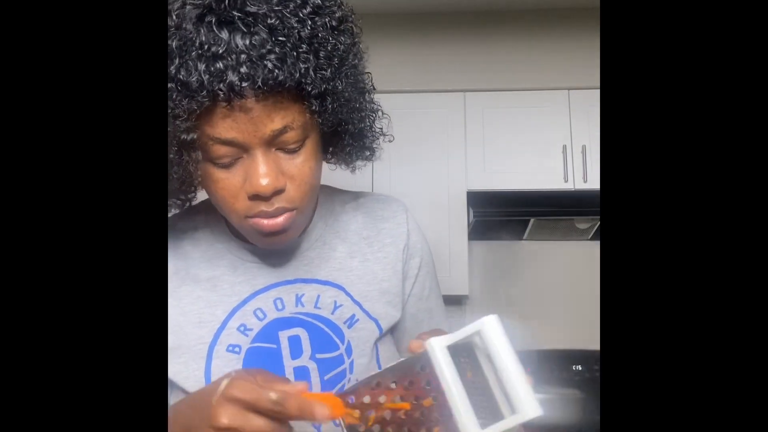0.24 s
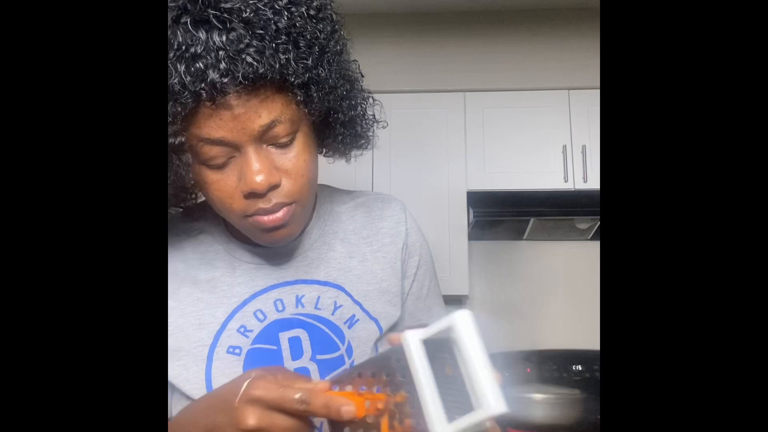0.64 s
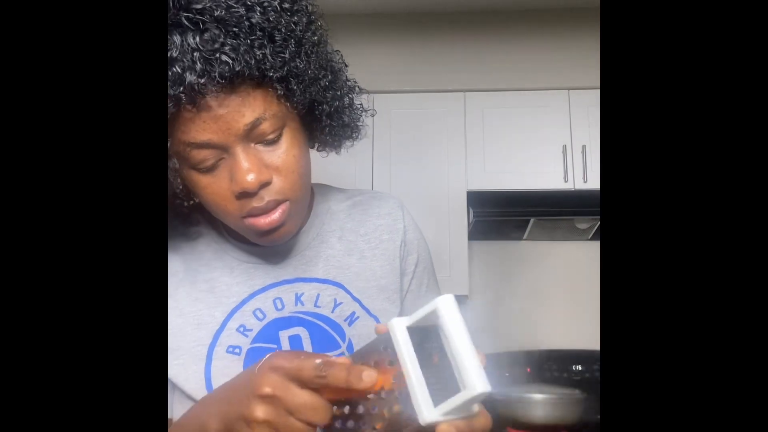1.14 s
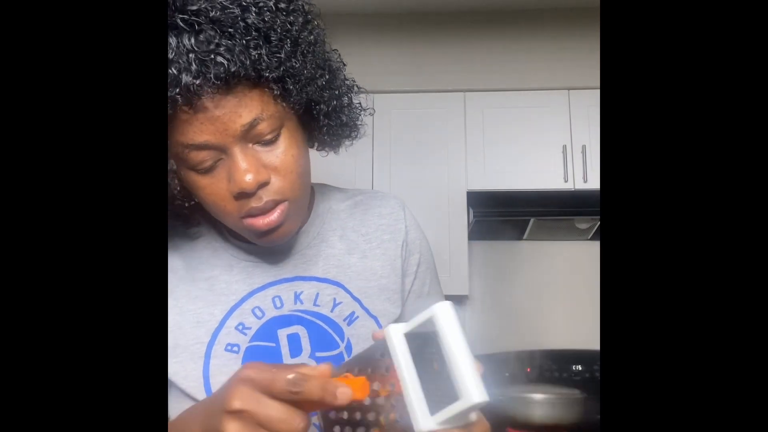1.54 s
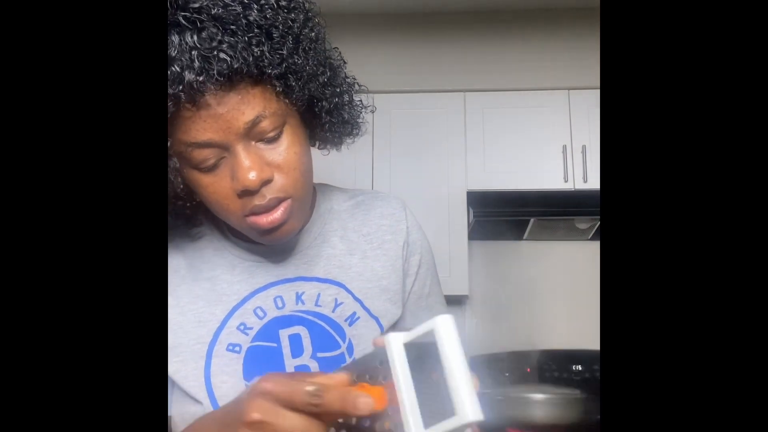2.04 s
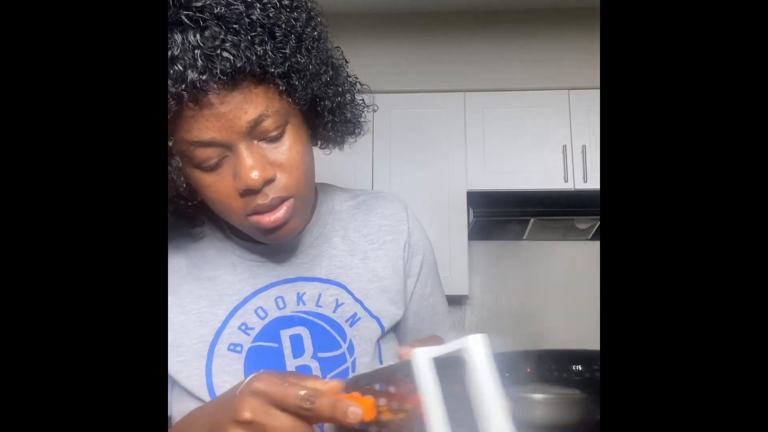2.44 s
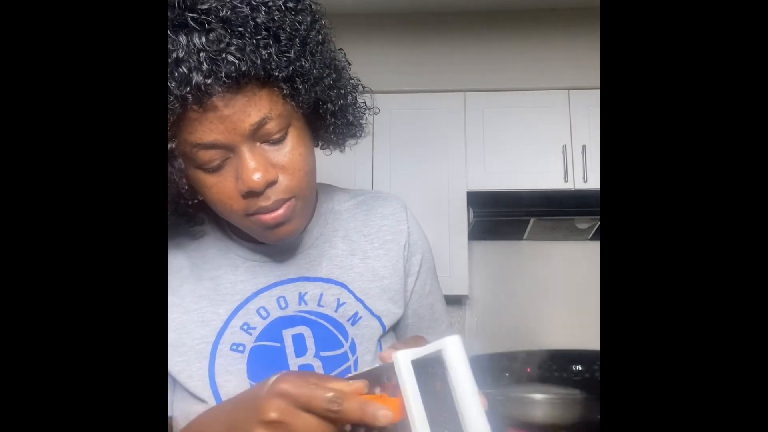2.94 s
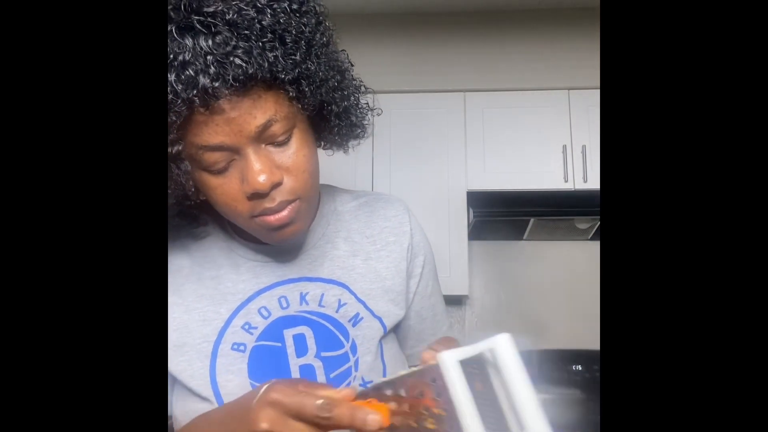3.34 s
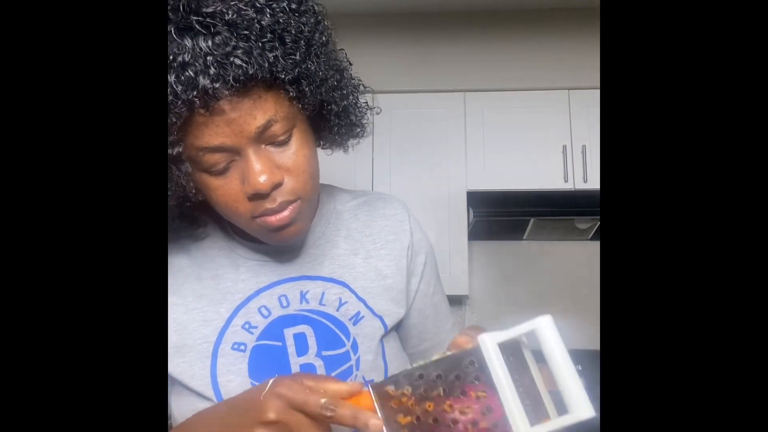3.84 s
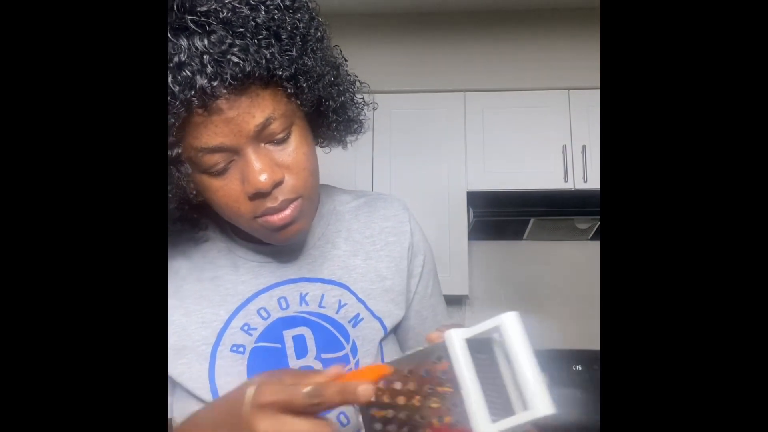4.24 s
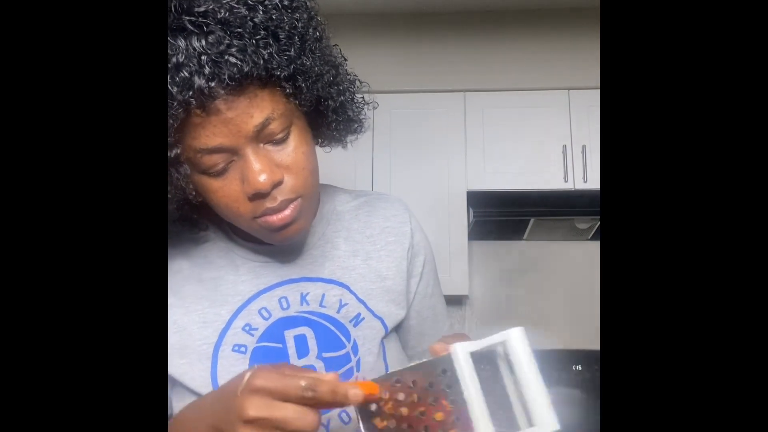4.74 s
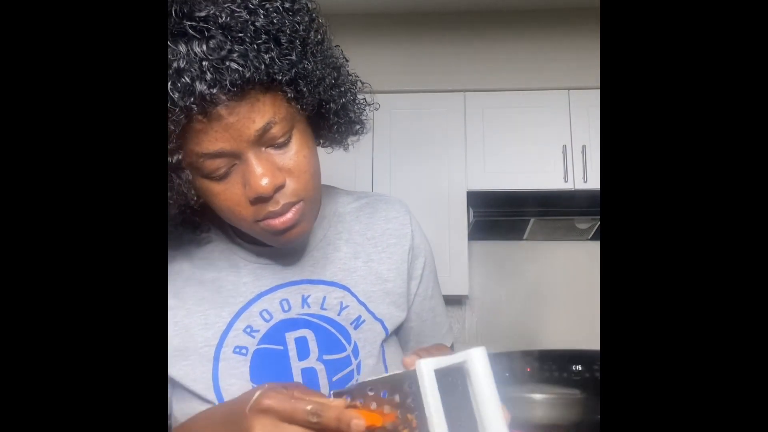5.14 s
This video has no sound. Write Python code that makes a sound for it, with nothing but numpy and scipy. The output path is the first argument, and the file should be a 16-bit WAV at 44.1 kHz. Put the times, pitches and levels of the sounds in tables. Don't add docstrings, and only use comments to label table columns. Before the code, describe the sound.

A carrot rasps over a thin steel grater in short uneven strokes, with knocks and small rattles, in a small echoing kitchen with faint hum.

```python
import sys
import numpy as np
from scipy import signal
from scipy.fft import rfft, irfft
from scipy.io import wavfile
from scipy.ndimage import uniform_filter1d

SR = 44100
rng = np.random.default_rng(int(sys.argv[2]) if len(sys.argv) > 2 else 0)


def convert_level_to_amplitude(level_db):
    exponent = np.asarray(level_db, float) / 20
    return 10 ** exponent


def file_out(sig):
    cols = np.atleast_2d(sig).T
    lim = np.clip(cols, -1, 1)
    pcm = np.round(lim * 32767).astype(np.int16)
    wavfile.write(sys.argv[1], SR, pcm)


N = 237670


def rms_one(x):
    return x / np.sqrt(np.mean(x ** 2) + 1e-20)


def at_hz(points, hz):
    table_hz, values = np.array(points).T
    return np.interp(np.log(hz + 1e-3), np.log(table_hz), values)


def coloured(x, spectrum):
    hz = np.fft.rfftfreq(N, 1 / SR)
    return rms_one(irfft(rfft(x) * convert_level_to_amplitude(at_hz(spectrum, hz)), N))


def drift(rate_hz):
    r = np.exp(-2 * np.pi * rate_hz / SR)
    noise = rng.standard_normal(N + SR)
    return rms_one(signal.lfilter([1], [1, -2 * r, r * r], noise)[SR:])


def resonance(x, hz, width_hz):
    r = np.exp(-np.pi * width_hz / SR)
    poles = [1, -2 * r * np.cos(2 * np.pi * hz / SR), r * r]
    return signal.lfilter([(1 - r * r) / 2, 0, (r * r - 1) / 2], poles, x)


def push_db():
    # grip in seconds, attack in seconds, hold in seconds, tearing in dB, change over the hold in dB.
    pushes = [(-.03, 0.019, 0.086, -47, -11.5), (0.061, .012, 0.044, -54, -1.5),
              (.385, .047, .008, -45.5, -11), (0.447, 0.012, 0.16, -42.5, -6.5),
              (1.046, 0.0078, 0.14, -51, 12), (1.56, 0.063, 0.08, -39.5, -0.5),
              (1.987, 0.0089, 0.04, -64, 16), (2.014, 0.027, 0.076, -42.5, 1),
              (2.196, 0.034, 0.022, -43, -4.8), (2.472, 0.049, 0.14, -36, -15.5),
              (2.914, 0.037, 0.13, -41, 2), (3.398, 0.042, 0.011, -39, -7.2),
              (3.509, 0.04, 0.048, -36, -1.5), (4.272, 0.0095, 0.036, -62, 3),
              (4.311, 0.026, 0.054, -44, 1.5), (4.473, 0.029, 0.059, -40.5, -2.5),
              (4.828, 0.0067, 0.021, -65, 13.5), (4.854, 0.017, 0.16, -45.5, 4.6),
              (5.335, 0.023, 0.035, -46.5, 1.5)]
    grip_below_db = 18.5
    release_db_per_s = 477
    drag_db, drag_db_per_s = -17, 86
    step = 32
    grip, attack, hold, db, change_db = np.array(pushes).T[:, :, None]
    t = np.arange(0, N + step, step) / SR - grip
    after = np.maximum(t - attack - hold, 0)
    swell_db = grip_below_db * np.clip(1 - t / attack, 0, 1)
    held_db = db - swell_db + change_db * np.clip((t - attack) / hold, 0, 1)
    level_db = held_db + np.maximum(-release_db_per_s * after, drag_db - drag_db_per_s * after)
    strongest_db = np.where(t < 0, -120, level_db).max(axis=0)
    return np.interp(np.arange(N) / step, np.arange(t.shape[1]), strongest_db)


def bites():
    # start in seconds, peak level in dB.
    deep_bites = [(0.078, -39), (0.382, -41.5), (0.4145, -38), (0.468, -44), (0.504, -7), (0.6388, -16.5),
                  (1.0525, -49), (1.1066, -25), (1.5364, -33), (1.5708, -47), (1.85, -56), (1.9977, -54),
                  (2.066, -11), (2.449, -29.5), (2.751, -28.5), (2.89, -31), (2.9223, -26), (3.3672, -19.5),
                  (3.517, -19), (3.8217, -58), (3.8446, -59), (4.2852, -52), (4.7012, -52), (4.8609, -43),
                  (4.964, -30), (5.3168, -37)]
    t60_s, rise_s = 0.058, 0.0053
    out, t = np.zeros(N), np.arange(SR // 8) / SR
    for s, db in deep_bites:
        part = out[round(s * SR):][:len(t)]
        bite = convert_level_to_amplitude(db - 24 - 60 * t / t60_s) * (1 - np.exp(-t / rise_s))
        part += bite[:len(part)]
    return out


def grating(snaps_per_s, spread_db, judder_db, ring_db, body_db):
    # frequency in Hz, density in dB per Hz.
    tear_spectrum = [(240, -10.5), (450, -12), (650, -2.5), (1400, 2), (3000, -5), (5000, -4), (7400, -14),
                     (9500, -14.5), (12500, -15.5), (15600, -18.5)]
    # frequency in Hz, width in Hz, level in dB.
    steel_modes = [(683.3, 40, 0), (907, 33, 3), (1650, 39, -40), (2516, 64, -6.5), (2916, 470, 5),
                   (3550, 28, -5), (5200, 65, -7.5), (6200, 50, 2.5), (7494, 180, -14.5), (7880, 17, -11.5),
                   (8320, 88, -10)]
    steel_follows, firm = 0.83, convert_level_to_amplitude(-29)
    sizes = convert_level_to_amplitude(spread_db * np.minimum(rng.exponential(1, (2, N)), 5))
    signs = rng.choice([-1, 1], (2, N))
    happens = rng.random((2, N)) < snaps_per_s / SR
    judder = convert_level_to_amplitude(judder_db * (drift(44) + drift(140)))
    direct_snaps, steel_snaps = sizes * signs * happens * judder

    tear = coloured(direct_snaps, tear_spectrum)
    ring = np.zeros(N)
    for hz, width_hz, db in steel_modes:
        mode = rms_one(resonance(steel_snaps, hz, width_hz))
        ring += convert_level_to_amplitude(db + 2.8 * drift(30)) * mode
    both = tear + convert_level_to_amplitude(ring_db) * rms_one(ring)

    low = signal.sosfiltfilt(signal.butter(1, 2700, fs=SR, output="sos"), both)
    high = both - low
    pressure = uniform_filter1d(convert_level_to_amplitude(push_db()), size=150) + bites()
    flex = firm * (pressure / firm) ** steel_follows
    return pressure * convert_level_to_amplitude(5.5) * rms_one(high) + flex * convert_level_to_amplitude(body_db) * rms_one(low)


def add(out, s, db, hz, t60, rise_s):
    start = round(s * SR)
    t = np.arange(min(int(.25 * SR), N - start)) / SR
    fall = convert_level_to_amplitude(db - 60 * t / max(t60, .004))
    swell = (1 - np.exp(-t / rise_s)) ** 2
    out[start:][:len(t)] += fall * swell * np.sin(2 * np.pi * hz * t)


def thuds():
    # start in seconds, bowl low mode in dB, bowl second mode in dB, grater wall in dB, wall in Hz.
    contacts = [(0.002, -63.5, -62, -63, 730), (0.385, -87, -74, -43, 653), (0.489, -79, -64, -48, 650),
                (0.504, -84, -63, -48, 630), (0.848, -48, -43, -30.5, 768), (0.889, -80, -75, -42.5, 837),
                (1.003, -80, -65, -47.5, 692), (1.355, -59, -54.5, -77, 665),
                (1.534, -71.5, -54.5, -41, 792), (1.996, -73, -67, -53, 670),
                (3.367, -50.5, -43, -47.5, 720), (3.818, -77, -66.5, -60, 780),
                (4.289, -79, -64.5, -56, 635), (5.316, -70, -65, -46.5, 661)]
    # bowl mode in Hz, t60 in seconds.
    bowl_modes = [(343, 0.065), (538, 0.05)]
    out = np.zeros(N)
    for s, low_db, second_db, wall_db, wall_hz in contacts:
        add(out, s, low_db + 14.0, *bowl_modes[0], rise_s=0.0039)
        add(out, s, second_db + 8, *bowl_modes[1], rise_s=0.0037)
        add(out, s, wall_db + 15.0, wall_hz, .03, rise_s=0.0068)
        add(out, s, wall_db - 4, 1.35 * wall_hz, .03, rise_s=.002)
    return out


def ticks():
    # start in seconds, peak level in dB, frequency in Hz, broad crack in dB relative to the peak.
    contacts = [(0.4256, -36, 1460, -5.5), (0.4693, -48.5, 8730, 15), (0.6384, -58, 7100, 9),
                (0.8447, -44.5, 1720, 10.5), (1.003, -57, 1470, 6), (1.4232, -39, 2080, -3.5),
                (1.536, -34.5, 1650, -8), (1.9978, -46.5, 2220, 4), (2.451, -56, 1450, 5),
                (2.8902, -56, 1430, 6), (2.9214, -40.5, 1560, -16), (3.3628, -42.5, 1330, 4.5),
                (3.819, -53, 1600, -4), (3.845, -58.5, 7900, -0.5), (3.8758, -61, 1370, -6),
                (4.286, -51, 1440, -11), (4.6992, -56, 2940, 4), (4.836, -51, 1270, 7),
                (4.8627, -44, 2430, 4.5)]
    t60_s, shudder_t60_s = .021, .25
    out = np.zeros(N)
    t = np.arange(SR // 4) / SR
    for s, db, hz, crack_db in contacts:
        add(out, s, db + 1.5, hz, t60_s, rise_s=0.0018)
        add(out, s, db - 11, 1.26 * hz, t60_s, rise_s=0.0017)
        edges = [.55 * hz, min(2.1 * hz, .45 * SR)]
        band = signal.butter(4, edges, "band", fs=SR, output="sos")
        brown = np.cumsum(rng.standard_normal(len(t)))
        crack = rms_one(signal.sosfilt(band, brown))
        fall = convert_level_to_amplitude(crack_db - 60 * t / t60_s) + convert_level_to_amplitude(crack_db - 14 - 60 * t / shudder_t60_s)
        out[round(s * SR):][:len(t)] += convert_level_to_amplitude(db - 6) * (1 - np.exp(-t / 0.002)) * fall * crack
    return out


def ports(x):
    # frequency in Hz, phase lead in radians, level in dB.
    port_difference = [(0, 0, 0), (450, -.6, -9), (750, -1.1, -5), (1100, -2.2, -.8), (2000, -1.9, -1.5),
                       (3000, -1.4, -3), (4500, -1.7, -6), (7100, -1.8, -6), (22050, -2.8, -6)]
    hz = np.fft.rfftfreq(N, 1 / SR)
    at, lead, level_db = np.transpose(port_difference)
    half = convert_level_to_amplitude(np.interp(hz, at, level_db) / 2) * np.exp(.5j * np.interp(hz, at, lead))
    return irfft(rfft(x) * np.array([1 / half, half]), N)


def pair(alike, size):
    share = np.clip(at_hz(alike, np.fft.rfftfreq(size, 1 / SR)), 0, 1)
    mid, side = rfft(rng.standard_normal((2, size)))
    return np.sqrt(1 + share) * mid + np.sqrt(1 - share) * side * [[1], [-1]]


def echoes(early_db, late_db):
    # frequency in Hz, t60 in seconds.
    kitchen_t60 = [(200, 0.55), (1000, 0.36), (4000, 0.36), (12000, 0.18)]
    # frequency in Hz, left-right likeness of the echoes from 0 to 1.
    echo_alike = [(150, 0.98), (500, 0.57), (1200, 0.21), (8000, 0.0096)]
    t = np.arange(SR // 2) / SR
    edges = 120 * 2 ** np.arange(8)
    dense = irfft(pair(echo_alike, size=len(t)), len(t))
    quick = irfft(pair(echo_alike, size=len(t)), len(t))
    tail = 0
    for low, high in zip(edges, edges[1:]):
        band = signal.sosfilt(signal.butter(1, [low, high], "band", fs=SR, output="sos"), dense)
        tail = tail + band * convert_level_to_amplitude(-60 * t / at_hz(kitchen_t60, np.sqrt(low * high)))
    tail = tail * (1 - np.exp(-t / 0.001))
    early = signal.lfilter([1, -1], [1, -.9], quick) * convert_level_to_amplitude(-60 * t / 0.016)
    early = convert_level_to_amplitude(early_db) * early / np.linalg.norm(early[0])
    return early + convert_level_to_amplitude(late_db) * tail / np.linalg.norm(tail[0])


def kitchen(x, early_db, late_db, count):
    steps = np.cumsum(rng.uniform(.01, .03, 400)) * SR - .03 * SR
    dealt = rng.integers(0, count, len(steps))
    out = 0
    for k in range(count):
        share = np.sqrt(np.interp(np.arange(N), steps, dealt == k))
        paths = echoes(early_db, late_db)
        out = out + signal.fftconvolve((share * x)[None], paths, axes=1)[:, :N]
    return out


def background():
    # frequency in Hz, left-right likeness of the air from 0 to 1.
    air_alike = [(60, 1), (300, 0.61), (800, 0.13), (2000, 0.036), (8000, 0.048)]
    # frequency in Hz, density in dB per Hz.
    air_spectrum = [(15, -60), (38, -11), (64, -6.5), (129, -8), (215, -14), (300, -19), (600, -27.5),
                    (880, -30.5), (1030, -20.5), (1250, -28.5), (2200, -37), (5300, -35), (9000, -47),
                    (15600, -55)]
    # frequency in Hz, width in Hz, rms level in dB.
    hum_lines = [(57.2, 3, -61.5), (115.8, 5, -61), (167.4, 29, -60), (209.4, 8.3, -63), (988, 27, -68.5)]
    air_db = -50.5
    mains_hz, mains_db, waver_db = 59.46, -50, -2.5
    colour = convert_level_to_amplitude(at_hz(air_spectrum, np.fft.rfftfreq(N, 1 / SR)))
    air = rms_one(irfft(pair(air_alike, size=N) * colour, N))
    white = rng.standard_normal(N)
    hum = np.zeros(N)
    for hz, width_hz, db in hum_lines:
        line = resonance(resonance(white, hz, width_hz), hz, width_hz)
        hum += convert_level_to_amplitude(db) * rms_one(line)
    mains = convert_level_to_amplitude(mains_db + waver_db * drift(12)) * np.sin(2 * np.pi * mains_hz * np.arange(N) / SR)
    return convert_level_to_amplitude(air_db - 3.0) * air * convert_level_to_amplitude([[1.1], [-1.1]]) + (hum + mains) * convert_level_to_amplitude([[.4], [-.4]])


def scene():
    rasp = grating(snaps_per_s=7000, spread_db=3.0, judder_db=0.5, ring_db=-3.5, body_db=0.0)
    blows = convert_level_to_amplitude(17.5) * (thuds() + ticks())
    direct = ports(rasp + blows)
    room = kitchen(rasp + convert_level_to_amplitude(-3) * blows, early_db=-2.5, late_db=-6.5, count=6)
    return direct + room + background()


def comb(turn):
    return np.exp(1j * np.angle(turn)) * np.tanh(.7 * np.abs(turn) ** 3)


def roll_off(x):
    return signal.sosfilt(signal.butter(12, 15720, fs=SR, output="sos"), x)


def record(dry):
    null_hz, period_hz, from_hz, full_hz = 10500, 4950, 5800, 7400
    shade_db = -5
    hz = np.fft.rfftfreq(N, 1 / SR)
    depth = np.interp(hz, [from_hz, full_hz], [0, 1])
    late = depth * np.exp(-2j * np.pi * (hz - null_hz) / period_hz)
    left, right = rfft(dry) * convert_level_to_amplitude(np.outer([-.5, .5], shade_db * depth))
    mid = (left + right) / 2 * comb(1 - late)
    side = (left - right) / 2 * comb(1 + late)
    steered = irfft([mid + side, mid - side], N)
    mix = signal.sosfilt(signal.cheby2(10, 60, 15900, fs=SR, output="sos"), steered)
    return roll_off(mix)


dry = scene()
out = record(dry)
file_out(out)
```